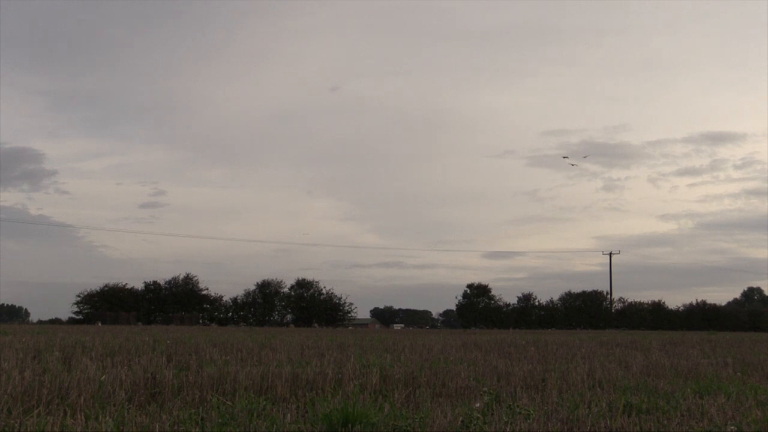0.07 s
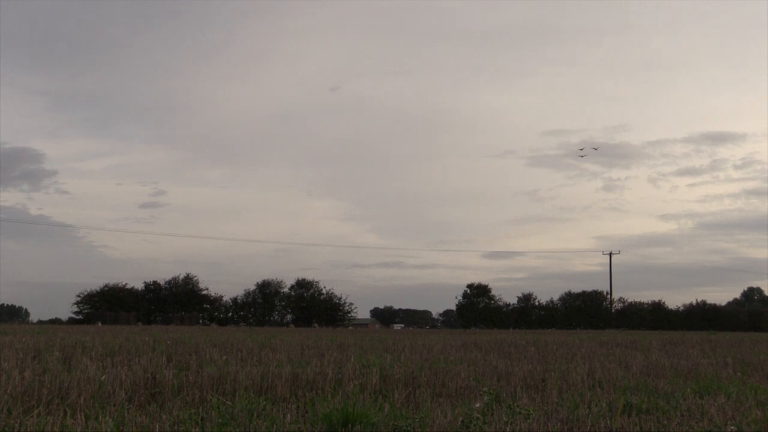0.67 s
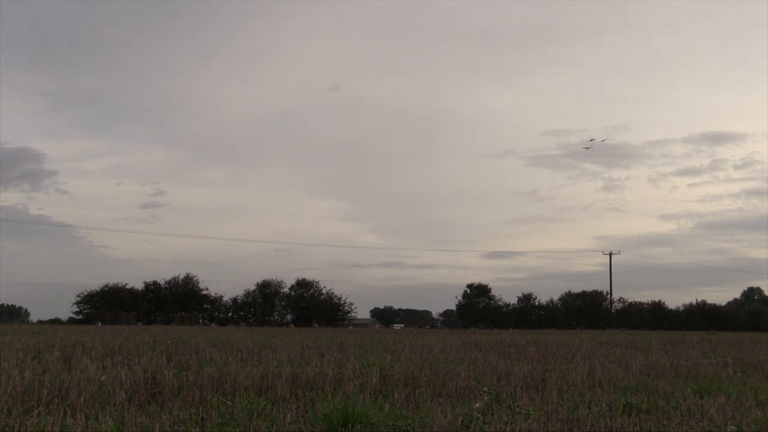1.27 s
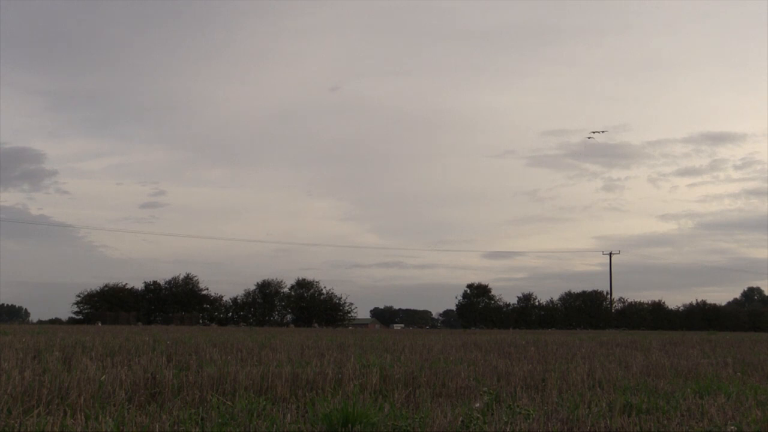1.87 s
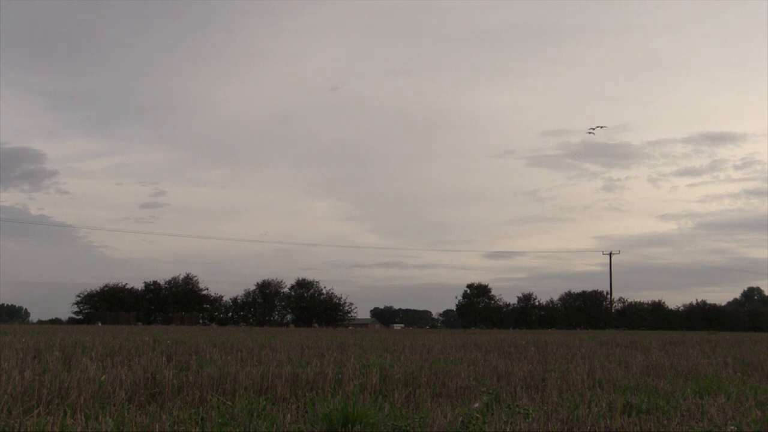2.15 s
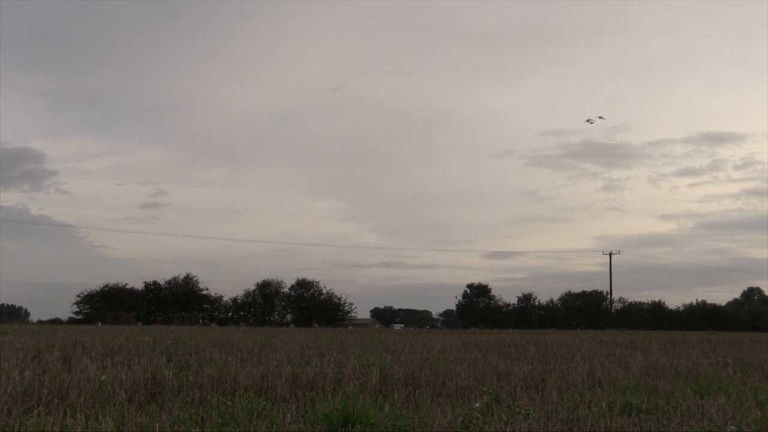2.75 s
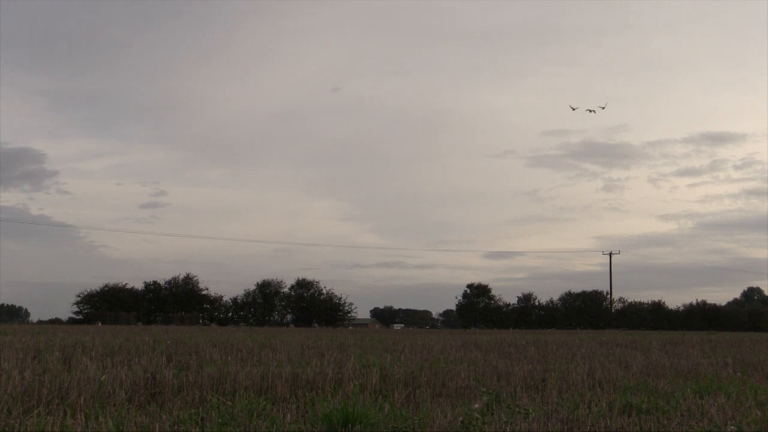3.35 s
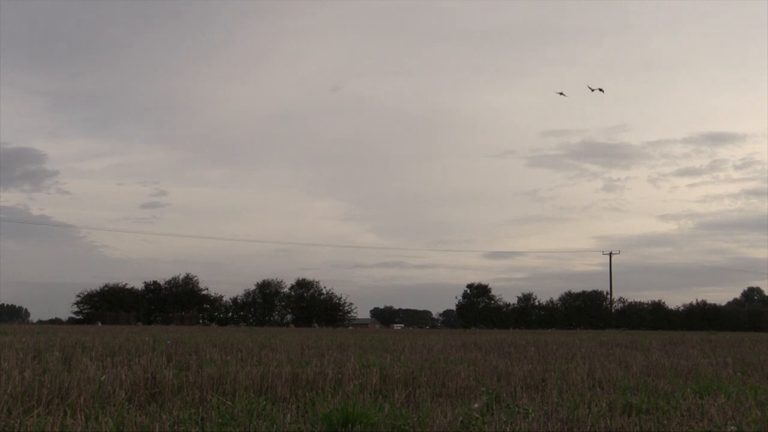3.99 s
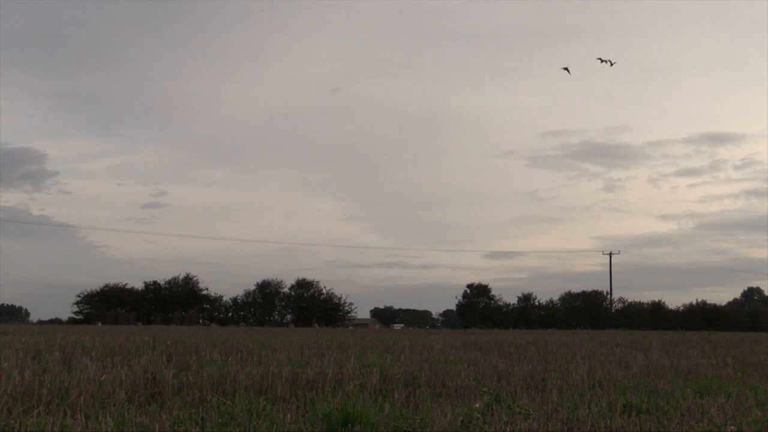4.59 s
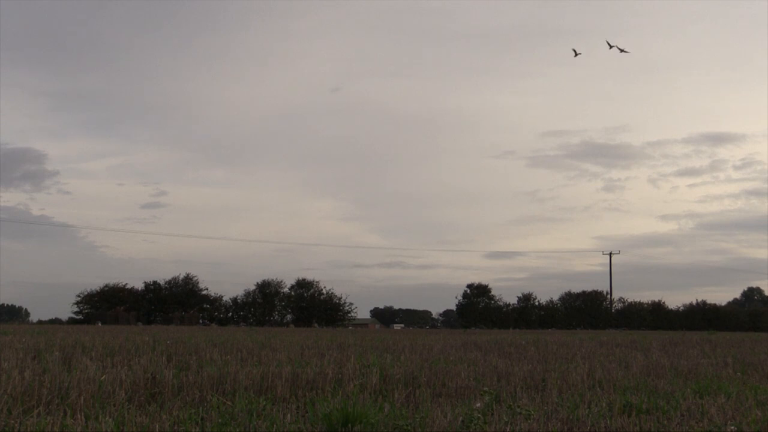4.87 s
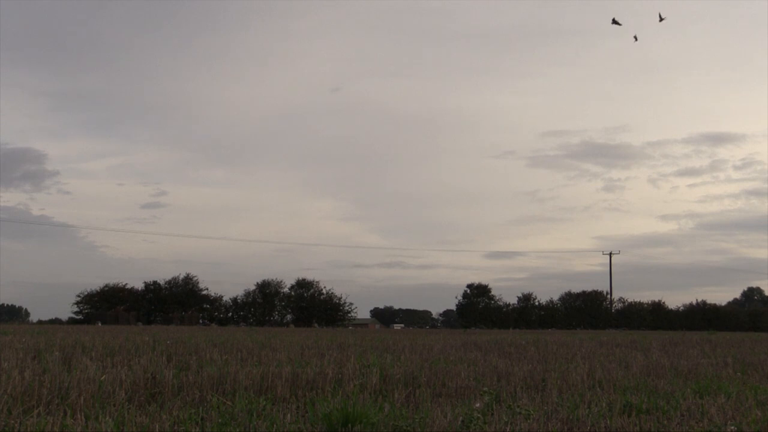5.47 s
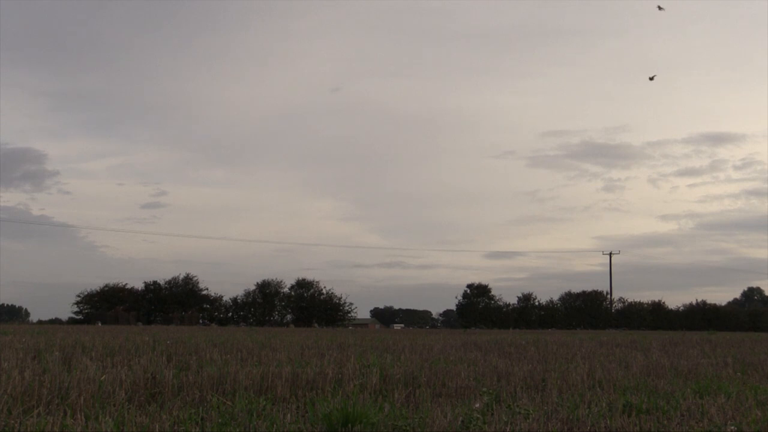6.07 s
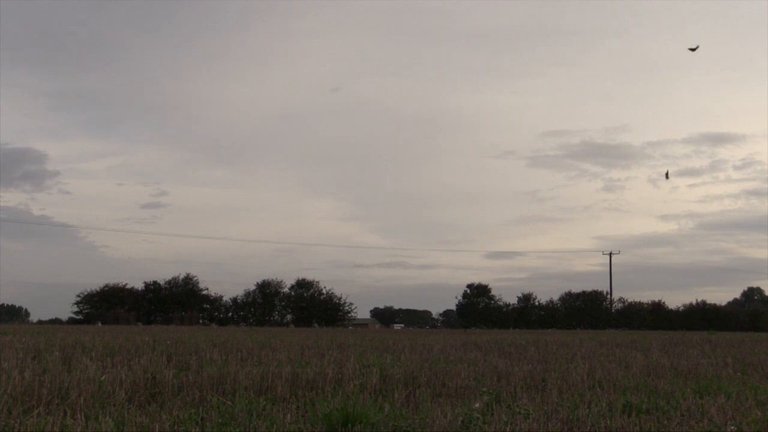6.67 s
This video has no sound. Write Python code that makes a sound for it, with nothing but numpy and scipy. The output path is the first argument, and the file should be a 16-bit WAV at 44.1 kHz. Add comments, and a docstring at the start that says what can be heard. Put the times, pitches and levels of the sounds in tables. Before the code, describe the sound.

A flock of geese calls faintly across an open field, mixing high two-note yelps, hoarse honks and clear nasal notes over the steady hum of a distant road. After about five seconds a shotgun fires right by the microphone, twice in quick succession, then twice more. Each blast overloads the microphone and rolls back from far trees. Steel gun parts clack between the shots, and a few more goose calls come through.

```python
"""A stubble field at dusk: geese fly in, yelping and honking, above the hum of a distant road. Each goose sings
a tone with overtones; a slower beat in its voice box makes it hoarse. A shotgun close by fires four times. Each
blast overloads the microphone and scatters back from the stubble and far trees, the gun's steel parts clack,
and a faint whistle falls away as the wad slows down."""
import sys
import numpy as np
from scipy import signal
from scipy.fft import rfft, irfft, next_fast_len
from scipy.io import wavfile
from scipy.ndimage import map_coordinates

SR = 44100
rng = np.random.default_rng(int(sys.argv[2]) if len(sys.argv) > 2 else 0)


def wrap_up_sound(samples):
    """Save the sound to the file named by the first command line argument, as 16-bit audio."""
    columns = np.atleast_2d(samples).T
    # keep every value between -1 and 1, then stretch to whole-number steps
    tamed = np.clip(columns, -1, 1)
    steps = np.round(tamed * 32767).astype(np.int16)
    wavfile.write(sys.argv[1], SR, steps)


N = 297234

# two-note yelps: start_s, climb_s, fall_s, hold_s, flick_s, hoarse_s, opening_hz, crest_hz, held_hz,
# sag_hz, flick_hz, first_db, second_db, overtone_db, dip_db
YELPS = [(0.276, .123, 0.04, .054, 0.0505, 0.089, 1338, 2068, 1610, 135, 1916, -32, -34.5, -3.5, 16),
         (1.681, 0.096, .06, 0.041, 0.0344, 0.147, 1290, 2010, 1429, 7.1, 1970, -30, -31, -1, 0.5),
         (2.602, .1, .105, 0.017, .036, 0, 1605, 1950, 1730, 5, 1910, -35.5, -34.5, -12.5, 9)]
# hoarse honks: middle_s, length_s, pitch_hz, level_db, overtone_db
HONKS = [(2, 0.18, 1560, -48.5, -0.5), (2.215, .12, 1503, -51.5, 3), (2.52, .13, 1426, -47.5, 3.5),
         (2.753, 0.1, 1546, -41.5, -6.5), (3.08, 0.098, 1690, -55.5, 13), (3.12, .1, 1552, -41.5, -11),
         (3.342, 0.099, 1420, -55, 2), (3.604, 0.14, 1516, -41.5, -6.5), (4.02, 0.11, 1550, -47, -2),
         (4.235, 0.09, 1610, -47, -1), (4.385, 0.066, 1457, -43, -6), (4.45, .09, 1550, -46, -1.5),
         (4.61, 0.075, 1257, -48.5, -10), (4.72, .11, 1550, -43, -5), (4.983, .12, 1564, -44, -3.5),
         (5.51, 0.18, 1600, -44, -15), (6.235, .12, 1010, -36, -2.5)]
# clear nasal calls: middle_s, length_s, pitch_hz, level_db, overtone_db
NASAL_CALLS = [(.215, 0.12, 862, -58, 12), (0.956, .13, 863, -65, 12.5), (1.079, .085, 1824, -59, 20),
               (1.2, .11, 855, -51, -5), (1.44, .092, 927, -52, -7), (2.37, .12, 871, -46.5, -3),
               (2.486, .11, 1520, -54.5, 14), (2.501, 0.12, 866, -50, 3), (6.27, .065, 918, -35, 0.5),
               (6.328, 0.083, 932, -35, -2)]
# how a goose's throat shapes its voice: frequency_hz, gain_db
THROAT = [(500, -33), (900, -9), (1400, 1), (1650, -5), (2000, -10), (2350, -17), (2750, -13.5),
          (3700, -17.5), (4300, -28), (4900, -14.5), (5500, -32.5), (6200, -32), (6900, -44), (9000, -53)]
# where a strained voice gains overtones: frequency_hz, share_0_to_1
STRAIN = [(1900, 0), (2600, 1), (4800, 0.89), (5600, 0.91)]
# gunshots: start_s, push_s, lag_s, crack_db, ping_db, scatter_db, swell_s, whistle_db
SHOTS = [(5.0211, 0.0028, 0.00021, -13, -7.5, -18, 0.043, -37),
         (5.2002, .0022, 0.00033, -11, -48, -17, 0.033, -48),
         (5.9332, 0.00255, 0.00092, -11.5, -10.5, -16.5, 0.024, -44),
         (6.3693, 0.0018, 0, -11.5, -18, -16, .029, -36)]
# the crack at the muzzle: frequency_hz, gain_db
CRACK = [(200, 1), (700, -32), (1500, 9.5), (2200, -14), (2900, -1), (4200, -15), (5600, -7.5), (8000, -18),
         (12000, -45), (16000, -42)]
# the tone of the blast's scattered echo, with the microphone's bright peaks: frequency_hz, gain_db
SCATTER_TONE = [(50, -48), (110, -8.5), (175, 2), (270, 2), (450, -9), (700, -15), (1300, -7),
                (2300, -15.5), (2850, -11.5), (3250, -15), (3700, -5.5), (4250, -18.5), (4900, -12.5),
                (7500, -20), (10600, -21.5), (15500, -37)]
# how long that echo takes to fade by 60 dB: frequency_hz, fade_s
SCATTER_FADE = [(150, 0.88), (400, 0.44), (1500, 0.37), (4000, 0.25), (8000, 0.72), (14000, 0.21)]
# the rolling echo from far trees: frequency_hz, gain_db
FAR_TREES = [(50, -38), (180, 12.5), (400, -2.5), (800, -5.5), (1500, -3), (2300, -11.5), (3500, -8.5),
             (6000, -17.5), (9000, -37), (15000, -43)]
# clacks of the gun's moving parts: start_s, level_db, slide_s, treble_db
CLACKS = [(5.149, -19, 0.013, -12.5), (5.176, -18.5, .007, 3), (5.317, -21.5, 0.012, -5),
          (5.3426, -22.5, 0.0097, -2), (5.7107, -22.5, 0.0047, -14.5), (6.049, -27.5, 0.0034, -18),
          (6.077, -19.5, 0.0083, -10), (6.1324, -25, 0.0076, -6), (6.474, -24, 0.0012, 0),
          (6.52, -27.5, 0.0049, -12)]
# dull bumps as the gun is handled: start_s, level_db
BUMPS = [(5.444, -29.5), (5.6216, -34), (6.202, -31.5), (6.645, -36)]
# the ringing tones of each clack, as the microphone colours them: frequency_hz, width_hz, gain_db
CLACK_TONES = [(763, 226, 2), (1370, 420, -2), (2160, 103, -1), (2920, 125, 3), (3770, 170, -0.5),
               (4920, 210, -4.5), (5860, 300, -7), (8800, 3400, -30)]
# the road's rumble: frequency_hz, gain_db
ROAD_RUMBLE = [(15, -45), (25, -27), (86, -2), (161, -2), (277, -5.5), (339, -8), (372, -10.5), (518, -16),
               (600, -21.5), (780, -41), (1320, -120)]
# the hiss of tyres: frequency_hz, gain_db
TYRE_HISS = [(290, -30), (500, -11.5), (657, -7.5), (815, -3.5), (982, -0.5), (1100, -0.5), (1290, 0.5),
             (1490, 1), (1820, -6), (1900, -11), (2610, -20), (3630, -20.5), (3960, -24), (7890, -31),
             (15500, -41.5)]
# how alike left and right are for sound near the gun: frequency_hz, likeness_0_to_1
NEAR_GUN = [(200, 1), (700, 0.95), (1650, 0.87), (5000, 0.5), (15000, 0.64)]
# the same for sound from all round: frequency_hz, likeness_0_to_1
ALL_ROUND = [(180, 0.99), (550, 0.78), (1650, 0.41), (5000, 0.13), (15000, 1)]

YELP_ROUGH, HONK_ROUGH, CLEAR_ROUGH = 0.74, 0.71, 0.05  # 0 is a pure voice, 1 is fully hoarse


def geese():
    """The flock: two-note yelps, hoarse honks and clear nasal calls."""
    flock = np.zeros(N)
    for start_s, *shape in YELPS:
        add(flock, start_s, yelp(*shape))
    for calls, rough in (HONKS, HONK_ROUGH), (NASAL_CALLS, CLEAR_ROUGH):
        for middle_s, length_s, *note in calls:
            add(flock, middle_s - length_s / 2, short_call(length_s, *note, rough))
    return flock


def yelp(climb_s, fall_s, hold_s, flick_s, hoarse_s, opening_hz, crest_hz, held_hz, sag_hz, flick_hz,
         first_db, second_db, overtone_db, dip_db, attack_s=0.073, release_s=0.038):
    """A note climbs, falters and breaks down to a clear held note, which flicks up and dies."""
    broken_s = climb_s + fall_s
    end_s = broken_s + hold_s + flick_s
    t = np.arange(int((end_s + release_s) * SR)) / SR
    climbing = (1 - np.cos(np.pi * ramp(t, .35 * climb_s, .65 * climb_s))) / 2
    breaking = ramp(t, climb_s, fall_s) ** 2
    flicking = np.sin(np.pi / 2 * ramp(t, broken_s + hold_s, flick_s))
    pitch_hz = (opening_hz + (crest_hz - opening_hz) * climbing
                + (held_hz - crest_hz) * breaking
                - sag_hz * ramp(t, broken_s, hold_s)
                + (flick_hz - held_hz + sag_hz) * flicking
                - 3500 * np.maximum(t - end_s, 0))  # droops as it dies
    fade_db = 21 * (1 - ramp(t, 0, attack_s) + ramp(t, end_s, release_s))
    effort_db = first_db + (second_db - first_db) * breaking - fade_db
    # at the break and on high notes the lowest tone weakens, while the overtones stay
    falter_db = dip_db * np.exp(-((t - climb_s - 0.4 * fall_s) / 0.027) ** 2 / 2)
    weak_db = falter_db + 13.5 * np.maximum(np.log2(pitch_hz / 1440), 0)
    rough = YELP_ROUGH + (CLEAR_ROUGH - YELP_ROUGH) * ramp(t, hoarse_s - 0.004, 0.008)
    return voice(pitch_hz, effort_db - weak_db, overtone_db + weak_db, rough,
                 jitter=0.0061, beat_jitter=0.0151)


def short_call(length_s, pitch_hz, level_db, overtone_db, rough):
    """One goose note that rises and falls in pitch and loudness."""
    slack = np.linspace(-1, 1, int(length_s * SR)) ** 2  # 1 at the ends, 0 in the middle
    return voice(pitch_hz * (1 - 0.0776 * slack), level_db - 10.5 * slack, overtone_db, rough,
                 jitter=0.0036, beat_jitter=.007)


def voice(pitch_hz, level_db, overtone_db, rough, jitter, beat_jitter):
    """The voice box sings multiples of one pitch; a slower beat splits them into hoarse clusters."""
    size = len(pitch_hz)
    far_db = min(level_db.max() + 38.5, 0)  # the fainter the goose, the more the air dulls its treble
    air_db = lambda hz: far_db * along([(4300, 0.059), (5600, 0.75)], hz)
    throat = lambda hz: amp(along(THROAT, hz) + overtone_db * along(STRAIN, hz) + air_db(hz))
    multiples = np.arange(1, 8)[:, None]
    flutter = amp(3 * np.array([wobble(72.8, size) for _ in multiples]))
    phase = multiples * phase_of(pitch_hz * (1 + jitter * wobble(176.3, size)))
    clear = np.sum(flutter * throat(multiples * pitch_hz) * np.sin(phase), axis=0)
    # every beat restarts the tone, so multiples of the beat are strongest near multiples of the pitch
    beat_hz = 305 * rng.uniform(.88, 1.06) * (pitch_hz / np.median(pitch_hz)) ** .45
    beat_multiples = np.arange(2, 23)[:, None]
    tones_hz = beat_multiples * beat_hz
    spread_hz = 105 + 95 * rough
    gaps = [(tones_hz - n * pitch_hz) / (spread_hz * n ** .6) for n in range(1, 5)]
    clusters = np.sqrt(sum(1 / (1 + gap ** 2) ** 1.5 for gap in gaps))
    beat_phase = beat_multiples * phase_of(beat_hz * (1 + beat_jitter * wobble(216.4, size)))
    beat_phase += rng.uniform(0, np.pi, beat_multiples.shape)
    hoarse = np.sum(clusters * throat(tones_hz) * np.sin(beat_phase), axis=0)
    tone = (1 - rough ** 2) * clear + 1.12 * rough * hoarse
    loudness = amp(level_db + 1.3 * wobble(97, size)) * signal.windows.tukey(size, .08)
    return np.sqrt(2) * tone * loudness


def hedge_echo(flock, fade_s=0.34):
    """Hedges send the calls back as a blurred copy from all round."""
    t = np.arange(SR) / SR
    tail = noise(np.ones_like, SR, ALL_ROUND) * amp(-60 * t / fade_s) * rise(t, 0.0047)
    return signal.fftconvolve(flock[None], tail / np.linalg.norm(tail[0]), axes=1)[:, :N]


def shotgun():
    """Each shot is a blast, its echoes from stubble and trees, and a whistle."""
    gun, t = np.zeros((2, N)), np.arange(SR) / SR
    for start_s, push_s, lag_s, crack_db, ping_db, scatter_db, swell_s, whistle_db in SHOTS:
        add(gun, start_s, blast(push_s, lag_s, crack_db, ping_db))
        add(gun, start_s, amp(scatter_db) * stubble_scatter(t, swell_s))
        add(gun, start_s, tree_echo(t))
        add(gun, start_s, amp(whistle_db) * wad_whistle(t))
    return gun


def blast(push_s, lag_s, crack_db, ping_db, drive=4, ping_hz=1360):
    """A sharp crack with a brief ping; lag_s later a push of air overloads the microphone."""
    t = np.arange(SR // 10) / SR
    pressure = np.tanh(drive * (t / push_s - 1) * np.exp(-.76 * t / push_s))
    # the microphone's bass filters keep swinging after the push
    low_cut = lambda hz, edge_hz, loss: -hz ** 2 / (edge_hz ** 2 - hz ** 2 + 1j * loss * edge_hz * hz)
    bass_loss = lambda hz: low_cut(hz, 185, 0.92) * low_cut(hz, 72, 0.67) * 1j * hz / (200 + 1j * hz)
    treble_loss = lambda hz: 1 / (1 + 1j * hz / 2400) ** 2
    delay = lambda hz: np.exp(-2j * np.pi * hz * lag_s)
    boom = filtered(pressure, lambda hz: bass_loss(hz) * treble_loss(hz) * delay(hz))
    crack = noise(colour(CRACK), len(t)) * amp(crack_db - 60 * t / 0.02)
    ping = np.sin(2 * np.pi * ping_hz * t) * amp(ping_db + 5 - 60 * t / 0.019)
    return amp(4.0) * boom + crack + ping


def stubble_scatter(t, swell_s):
    """Countless stalks return the blast: it swells as the wave spreads, then dies band by band."""
    hz, frame_s, bands = signal.stft(noise(colour(SCATTER_TONE), SR), SR, nperseg=256)
    fade = amp(-60 * np.maximum(frame_s - swell_s, 0) / along(SCATTER_FADE, hz)[:, None])
    echo = signal.istft(bands * fade, SR, nperseg=256)[1][:, :SR]
    peak_db = 4 * np.exp(-((t - swell_s) / 0.0068) ** 2)
    return echo * rise(t, 0.002) * amp(-11.5 + peak_db + 2.47 * wobble(221.3, SR))


def tree_echo(t, fade_s=1.81):
    """Far trees return the blast as a low, uneven roll."""
    roll = noise(colour(FAR_TREES), SR) * rise(t, 0.13)
    return roll * amp(-34.0 - 60 * t / fade_s + 2.03 * wobble(22.9, SR))


def wad_whistle(t, start_hz=10200, halving_s=.295, fade_s=0.86):
    """The flying wad whistles, and the pitch drops as the air slows it."""
    pitch_hz = start_hz / (1 + t / halving_s) * (1 + .05 * wobble(1600, SR))
    loudness = rise(t, .15) * amp(6 - 60 * t / fade_s + 2.5 * wobble(60, SR))
    return np.sin(phase_of(pitch_hz)) * loudness


def gun_handling():
    """The gun's parts clack sharply, and handling it adds dull bumps."""
    knocks = np.zeros((2, N))
    for start_s, level_db, slide_s, treble_db in CLACKS:
        add(knocks, start_s, knock(level_db, slide_s, treble_db, thud_db=-16))
    for start_s, level_db in BUMPS:
        add(knocks, start_s, knock(level_db, slide_s=0.0095, treble_db=-12, thud_db=15.5))
    return knocks


def knock(level_db, slide_s, treble_db, thud_db):
    """Steel parts strike, then slide: a tick and a short rattle over a thud from the gun's stock."""
    t = np.arange(SR // 8) / SR
    tones = lambda hz: sum(
        (-1) ** k * amp(db) * 1j * hz * width / (centre ** 2 - hz ** 2 + 1j * hz * width)
        for k, (centre, width, db) in enumerate(CLACK_TONES))
    curve = lambda hz: tones(hz) * amp(along([(1400, 0), (3000, treble_db)], hz))
    tick = filtered(1.0 * (t == 0), curve)
    fade_db = 60 * np.maximum(t - slide_s, 0) / .02
    rattle = noise(curve, len(t)) * amp(2.2 * wobble(600, len(t)) - fade_db)
    thud = np.sin(2 * np.pi * 310 * t) * amp(thud_db - 3.5 - 60 * t / 0.022)
    return amp(level_db - 7) * (amp(21) * tick / np.linalg.norm(tick) + rattle + thud)


def distant_road(rumble_db=-49, hiss_db=-47):
    """Far traffic: a low rumble and a tyre hiss, both wavering on the evening air."""
    rumble = noise(colour(ROAD_RUMBLE), N, ALL_ROUND) * amp(rumble_db + 0.27 * wobble(11, N))
    hiss = noise(colour(TYRE_HISS), N, ALL_ROUND) * amp(hiss_db + 0.49 * wobble(8.4, N))
    return rumble + hiss


def amp(db):
    """Turn decibels into a number to multiply by."""
    return 10 ** (np.asarray(db) / 20)


def along(points, hz):
    """Read between the rows of a (frequency_hz, value) table, on a log frequency scale."""
    frequencies, values = np.transpose(points)
    return np.interp(np.log(hz + 1), np.log(frequencies + 1), values)


def colour(points):
    """Turn a (frequency_hz, gain_db) table into a filter curve."""
    return lambda hz: amp(along(points, hz))


def wobble(rate, size):
    """A smooth curve through `rate` random values a second."""
    knots = rng.standard_normal(int(size * rate / SR) + 4)
    return map_coordinates(knots, [np.arange(size) * rate / SR])


def ramp(t, start_s, length_s):
    """0 before the start, then rising evenly to 1."""
    return np.clip((t - start_s) / length_s, 0, 1)


def rise(t, rise_s):
    """A fade-in from 0 towards 1, quick at first."""
    return 1 - np.exp(-t / rise_s)


def phase_of(hz):
    """The running angle of a tone whose pitch changes."""
    return 2 * np.pi * np.cumsum(hz) / SR


def filtered(sound, curve):
    """Multiply each frequency in the sound by the filter curve."""
    size = sound.shape[-1]
    padded = next_fast_len(size + SR // 4)
    return irfft(rfft(sound, padded) * curve(np.fft.rfftfreq(padded, 1 / SR)), padded)[..., :size]


def noise(curve, size, likeness=NEAR_GUN):
    """Filtered stereo noise of average power 1, nearly the same on both sides in the bass."""
    angle = lambda hz: np.arccos(np.clip(along(likeness, hz), -1, 1)) / 2
    split = lambda hz: curve(hz) * np.array([np.cos(angle(hz)), np.sin(angle(hz))])
    mid, side = filtered(rng.standard_normal((2, size)), split)
    stereo = np.array([mid + side, mid - side])
    return stereo / np.sqrt(np.mean(stereo ** 2) + 1e-20)


def add(track, start_s, sound):
    """Mix a sound into the track from start_s on."""
    i = round(start_s * SR)
    track[..., i:i + sound.shape[-1]] += sound[..., :max(N - i, 0)]


def scene():
    """Geese overhead, the gun close by, the road far off."""
    flock = geese()
    direct = flock * amp([[.7], [-.7]])  # a little to the left
    return direct + amp(-9) * hedge_echo(flock) + shotgun() + gun_handling() + distant_road()


def record(dry, ceiling=0.93, hardness=5, top_hz=15700):
    """The microphone rounds off loud peaks and keeps nothing above top_hz."""
    rounded = dry / (1 + np.abs(dry / ceiling) ** hardness) ** (1 / hardness)
    return filtered(rounded, lambda hz: hz < top_hz)


dry = scene()
out = record(dry)
wrap_up_sound(out)
```